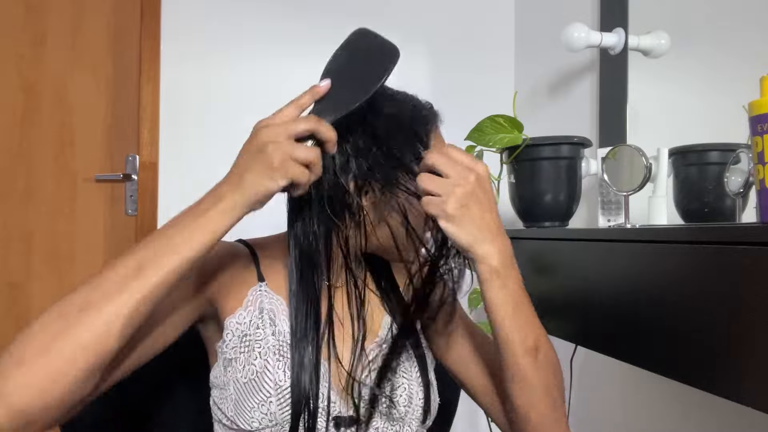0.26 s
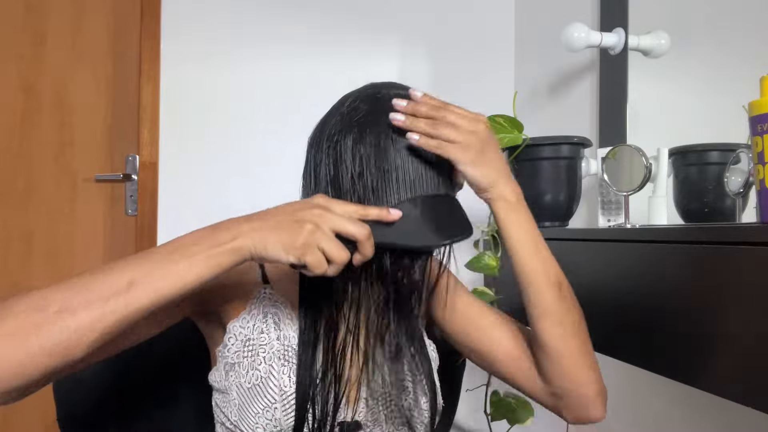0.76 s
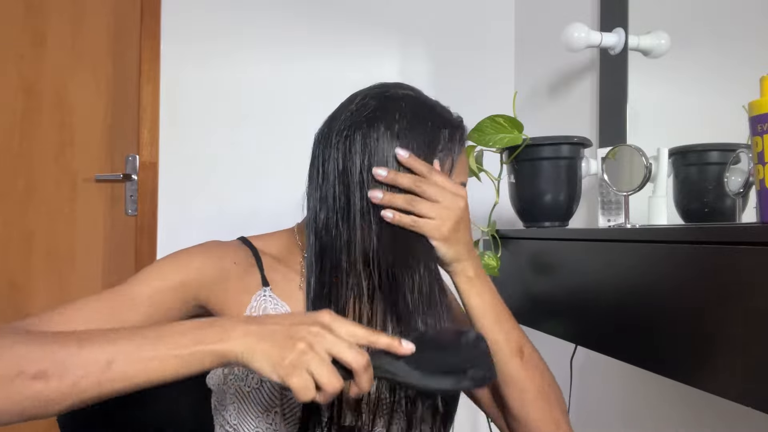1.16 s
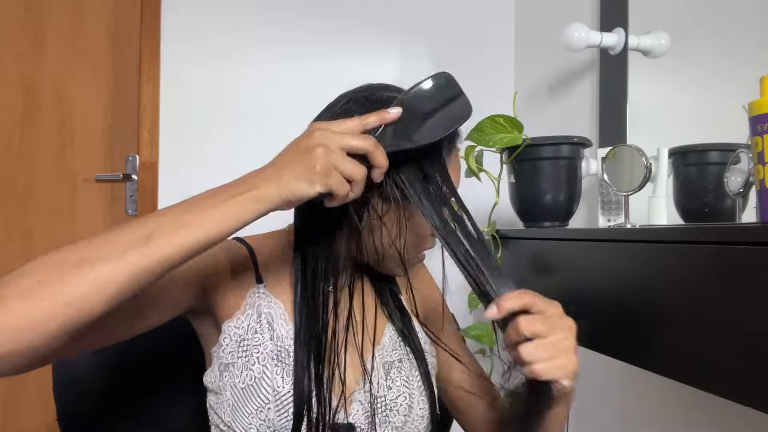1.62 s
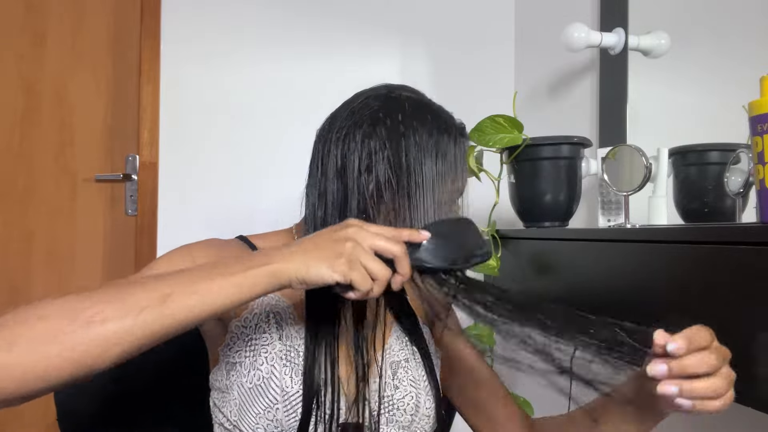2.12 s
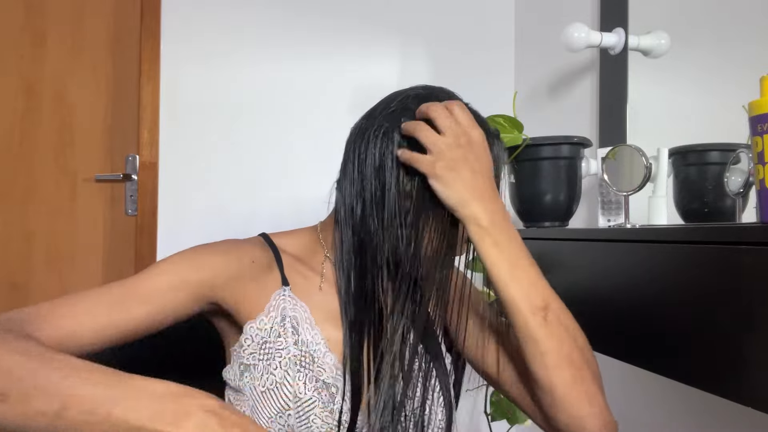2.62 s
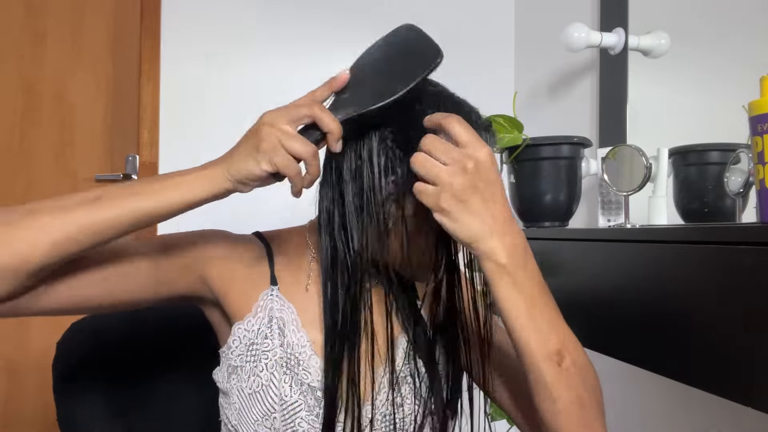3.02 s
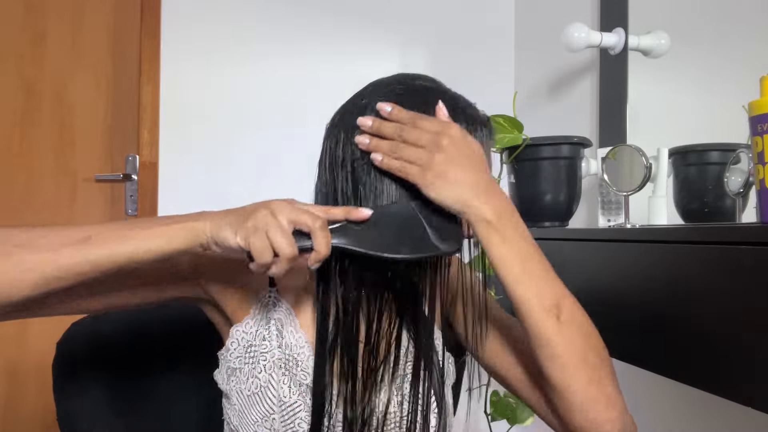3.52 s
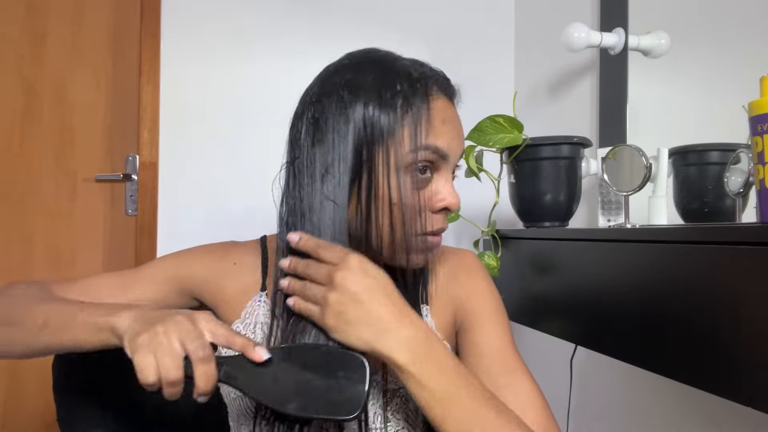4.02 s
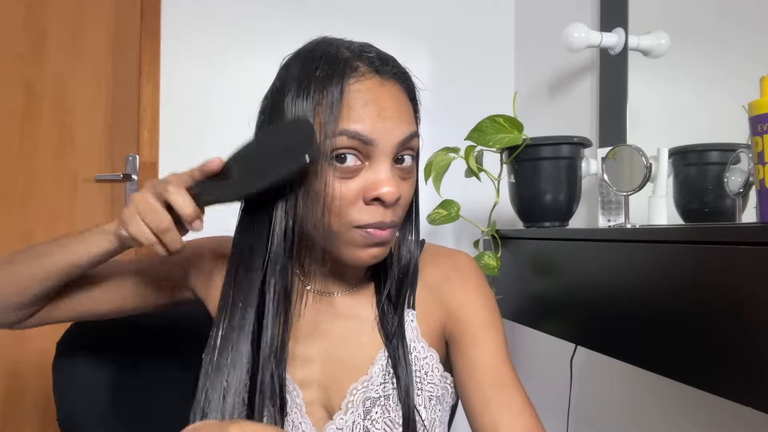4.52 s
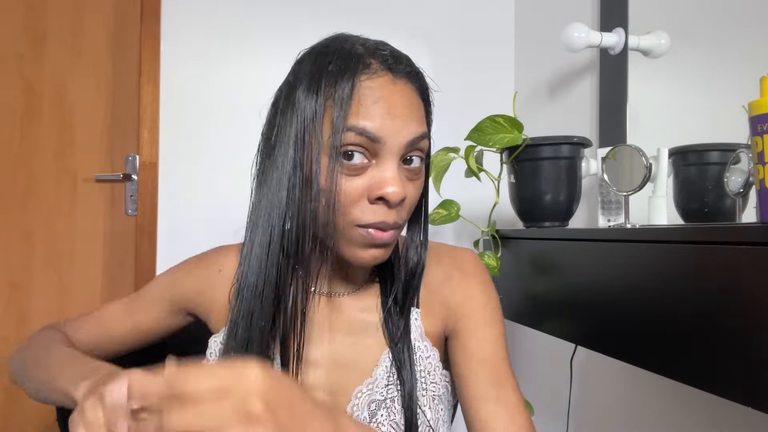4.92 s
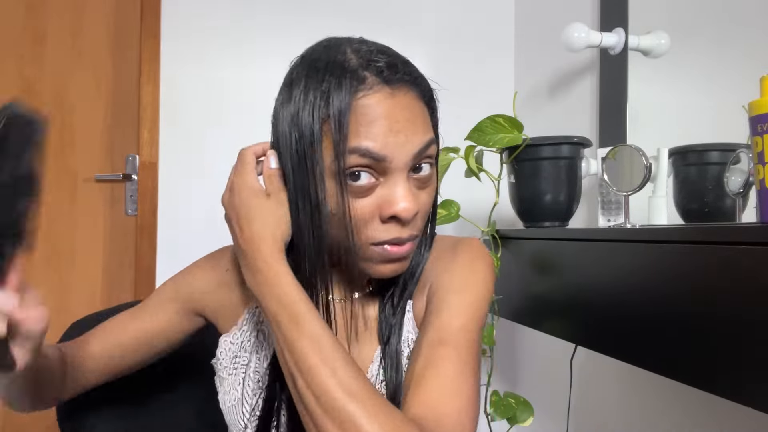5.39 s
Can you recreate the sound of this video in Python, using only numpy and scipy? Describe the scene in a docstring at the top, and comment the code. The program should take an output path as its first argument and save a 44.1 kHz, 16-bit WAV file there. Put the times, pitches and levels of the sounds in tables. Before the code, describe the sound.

A steady low hum, around 60 hertz and gently beating, lies under dull room air and faint microphone hiss. Tiny rubs of fingers and hair open the scene. At 0.5 s a brush presses into wet hair with a grainy, hollow rasp, pin ticks and cushion knocks; a sharp tangle snap near 0.84 s starts a softer hissing pull until about 1.25 s. A quieter stroke runs from 1.7 to 2.3 s, then small snaps at 2.5 s. A scratchy press at 3.2-3.4 s flicks the paddle and slides down until 4 s, with clicks and knocks at 4.2 s. A light press at 4.6 s leads to a thin fading hiss. Around 4.9-5.1 s soft low bumps, a short scrape and a rapid clatter of plucked pins cross clothing, the loudest moment. Afterwards mostly hum remains, with a faint rub at 5.4 s. Close, dry-ish, short small-room reflections.

```python
"""A small room where motors hum and beat: a paddle brush is pulled through long wet hair, close to a phone.
Random slips through resonators make the pins rasp on the scalp; finer noise makes the strands hiss.
Decaying sines ring the paddle and knock the cushion; short noise bursts are tangles snapping.
Near the end the brush bumps and drags over clothing, lower down. The phone listens with two close ports."""
import sys
import numpy as np
from scipy import signal
from scipy.fft import rfft, irfft
from scipy.io import wavfile
from scipy.ndimage import uniform_filter1d

SR = 44100
rng = np.random.default_rng(int(sys.argv[2]) if len(sys.argv) > 2 else 0)


def wav_record(signal):
    """Record a signal, one row per channel, as 16-bit PCM in the file named by sys.argv[1]."""
    frames = np.transpose(np.atleast_2d(signal))
    bounded = np.clip(frames, -1, 1)
    # unit amplitude maps onto the largest positive 16-bit level
    quanta = np.round(bounded * 32767).astype(np.int16)
    wavfile.write(sys.argv[1], SR, quanta)


N = 249312
TIME = np.arange(N) / SR
FREQ = np.maximum(np.arange(N // 2 + 1) * SR / N, 1)
CONTROL_TIME = TIME[::64]  # the hand moves slowly: a coarse clock for its gestures

# paddle modes: multiple of the pitch, mean level/dB, t60/s
PADDLE_MODES = [(0.68, -4, 0.026), (0.95, 0.5, 0.032), (1.147, -3.5, 0.033), (1.35, -7, 0.021),
                (1.7, -27, 0.012), (2.05, -28, 0.014)]
# spectrum of pins rasping: f/Hz, relative level/dB
RASP_SPECTRUM = [(450, -3.5), (760, -3), (900, -10), (1000, 1), (1350, 0.5), (1560, -11.5), (1900, -9),
                 (2400, -12), (3000, -15), (3500, -15), (5000, -20), (9000, -22)]
# spectrum of the cushion's hollow body: f/Hz, relative level/dB
HOLLOW_SPECTRUM = [(100, -47), (210, -4.5), (340, -4), (520, 11), (640, 2), (750, 6.5), (930, -4),
                   (1600, -32.5)]
# the two ports, heard from the head: f/Hz, left minus right level/dB, left leads/rad
HEAD_PORTS = [(58, -4.5, 0.5), (255, -5, 1), (644, -2.5, -1.6), (1230, -4, 0.15), (2140, -1.5, -1.06),
              (3560, -3, -1.33), (4700, -5.5, -2), (7600, -1.5, -1.6), (10500, 0, 0.33), (14500, 0, 3.5)]


def undb(db):
    """Decibels to gain."""
    return np.exp(np.asarray(db) * (np.log(10) / 20))


def unit(x):
    """Scale to rms 1."""
    return x / np.sqrt(np.mean(x ** 2))


def across(points, column=1):
    """Read a table on the log-frequency axis."""
    table = np.array(points)
    return np.interp(np.log(FREQ), np.log(table[:, 0]), table[:, column])


def colour(x, points):
    """Give a sound a spectrum; rms 1."""
    return unit(irfft(rfft(x) * undb(across(points)), N))


def walk(rate):
    """Random levels that glide from one to the next about every 1 / rate s; rms 1."""
    hold = max(int(SR / rate), 1)
    levels = rng.standard_normal(N)[:N // hold + 1]
    return unit(uniform_filter1d(np.repeat(levels, hold), hold)[:N])


def slips(rate, spread_db):
    """Stick-slip clicks of unequal size at random instants, rate per second on average."""
    out = np.zeros(N)
    at = np.flatnonzero(rng.random(N) < rate / SR)
    push, size = rng.standard_normal((2, N), dtype=np.float32)[:, at]
    out[at] = push * undb(spread_db * size)
    return out


def add(out, s, sound):
    """Mix a short sound in at time s."""
    start = int(s * SR)
    out[start:start + len(sound)] += sound[:N - start]


def swell(s, length, rise, fall, fade=0):
    """Gain of one contact: it rises until s, fades for its length, then falls away; slopes in dB per second."""
    age = CONTROL_TIME - s
    rising = rise * np.minimum(age, 0)
    fading = fade * np.clip(age, 0, length)
    falling = fall * np.maximum(age - length, 0)
    return undb(rising - fading - falling)


def strike(events, modes, scatter, crack, push_s, crack_s=0.0025, crack_hz=3200):
    """A yielding contact builds up over push_s and rings the modes, differently each time, with a dull crack."""
    out, t = np.zeros(N), TIME[:SR // 10]
    ratio, db, t60 = np.array(modes).T[:, :, None]
    dull = signal.butter(2, crack_hz, fs=SR, output="sos")
    for s, hz, peak_db, *_ in events:
        detune, size = rng.standard_normal((2, len(modes), 1))
        mode_hz = hz * ratio * (1 + scatter * detune)
        decay = undb(db + 2 * size - 60 * t / t60)
        ring = np.sum(decay * np.sin(2 * np.pi * mode_hz * t), axis=0)
        grit = unit(signal.sosfilt(dull, rng.standard_normal(len(t)))) * np.exp(-t / crack_s)
        build_up = 1 - np.exp(-(t / push_s) ** 2)
        blow = (ring / np.abs(ring).max() + crack * grit) * build_up
        add(out, s, undb(peak_db) * blow / np.abs(blow).max())
    return out


def snaps(events, gain_db, top_hz, fade_s):
    """A wet tangle or a caught pin lets go with a short bright tick of band-limited noise."""
    out, t = np.zeros(N), TIME[:SR // 20]
    for s, *_, db in events:
        burst = rng.standard_normal(len(t)) * np.exp(-t / fade_s)
        add(out, s, undb(db + gain_db) * burst)
    return signal.sosfilt(signal.butter(2, [1900, top_hz], "band", fs=SR, output="sos"), out)


def ports(x, direction):
    """The sound reaches two close ports with unlike strength and timing, set by frequency and direction."""
    lean = undb(across(direction) / 2) * np.exp(.5j * across(direction, column=2))
    return irfft(rfft(x) * np.array([lean, 1 / lean]), N)


def room(x, t60_s, wet_db, low_hz, damp_hz):
    """Close bare walls return a short, duller tail, different on each side."""
    t = TIME[:SR // 2]
    shape = np.exp(-np.log(1000) * t / t60_s) * (t > .003)  # silent until the first return
    tail = rng.standard_normal((2, len(t))) * shape / np.sqrt(np.sum(shape ** 2))
    tail = signal.sosfilt(signal.butter(1, [low_hz, damp_hz], "band", fs=SR, output="sos"), tail)
    return undb(wet_db) * signal.fftconvolve(x[None], tail, axes=1)[:, :N]


def motor_hum(gain_db=2.5, throb_db=2.0, in_step_s=2.505):
    """Motors at slightly different speeds beat together, all in step at one moment; each level wanders."""
    # f/Hz, level/dB before the gain
    hums = [(61.98, -54.4), (58.4, -60), (57.88, -62.8), (123.98, -67)]
    out = 0
    for hz, db in hums:
        level = undb(db + gain_db + throb_db * walk(rate=12.0))
        out = out + level * np.sqrt(2) * np.cos(2 * np.pi * hz * (TIME - in_step_s))
    return out


def room_air(air_db=-59.0, waver_db=0.64):
    """A dull rush of air, wavering slightly: one directional signal, then one for each side."""
    # f/Hz, relative level/dB
    air_spectrum = [(20, -43), (36, -31), (54, 6), (68, 3), (82, 0), (105, -1.5), (155, -13), (225, -6.5),
                    (300, -14.5), (400, -12.5), (630, -20.5), (1000, -31.5), (2000, -40), (4000, -45.5),
                    (15500, -37.5)]
    return [colour(rng.standard_normal(N), air_spectrum) * undb(air_db + waver_db * walk(rate=10.0))
            for _ in range(3)]


def microphone_hiss(level_db=-78):
    """Each microphone adds its own faint, steady noise."""
    # f/Hz, relative level/dB
    mic_spectrum = [(500, 3.5), (3000, 2), (15500, -13.5)]
    steady = np.array([colour(rng.standard_normal(N), mic_spectrum) for _ in range(2)])
    return undb(level_db) * steady


def background(diffuse_db=-4):
    """Hum and air reach the ports; air in the middle range also comes from all sides; the microphones hiss."""
    air, left, right = room_air()
    middle = signal.butter(1, [200, 5000], "band", fs=SR, output="sos")
    diffuse = signal.sosfilt(middle, [left, right])
    return ports(motor_hum() + air + undb(diffuse_db) * diffuse, HEAD_PORTS) + microphone_hiss()


def rustling(slope_db_per_s=136):
    """The arms swing and shift with a low, dull rustle of coloured noise."""
    # arm movements: t/s, length/s, relative level/dB
    moves = [(0.532, 0.25, -57.5), (0.997, 0.18, -62.5), (2.215, 0.039, -62.5), (2.442, 0.064, -60),
             (3.532, 0.43, -63), (4.182, 0.24, -65.5)]
    # f/Hz, relative level/dB
    rustle_spectrum = [(100, -15), (190, 1.5), (300, -2.5), (450, -7), (700, -25.5), (1500, -44.5)]
    effort = sum(undb(db) * swell(s, length, slope_db_per_s, slope_db_per_s) for s, length, db in moves)
    return colour(rng.standard_normal(N), rustle_spectrum) * np.interp(TIME, CONTROL_TIME, effort)


def bumps(gain_db=-4.0, rough=0.52):
    """Soft contacts with the body swell and fade within a few low cycles, roughened by rubbing cloth."""
    # t/s, f/Hz, peak level/dB before the gain, half length to 1/e/s
    thumps = [(4.885, 195, -32.5, 0.021), (4.916, 249, -25.5, 0.0032), (4.937, 246, -31, 0.0094),
              (4.959, 262, -26, 0.005), (4.98, 279.6, -36.5, 0.027), (5.003, 292, -35.5, 0.0061),
              (5.035, 175, -41, 0.041), (5.209, 240, -45.5, .004)]
    thuds = 0
    for s, hz, db, length in thumps:
        age = TIME - s
        thuds = thuds + undb(db) * np.exp(-(age / length) ** 2) * np.cos(2 * np.pi * hz * age)
    return undb(gain_db) * thuds * (1 + rough * walk(rate=200))


def dragging():
    """The pins rake over cloth: a rasp, the hollow cushion and a duller hiss than hair gives."""
    # t/s, length/s (negative: the fall sets in before the rise is over), rasp, hollow body, hiss level/dB
    drag = (5, -0.0134, -51, -45.5, -50.5)
    # hiss of pins on cloth: f/Hz, relative level/dB
    cloth_spectrum = [(1000, -8), (1900, 8), (3300, -1), (4000, -5), (5400, -1), (7500, -7), (10000, -1),
                      (12500, -6), (15500, -2)]
    s, length, rasp_db, hollow_db, hiss_db = drag
    scrape = np.interp(TIME, CONTROL_TIME, swell(s, length, rise=214, fall=296))
    body = np.interp(TIME, CONTROL_TIME, swell(s, length, rise=121, fall=121))
    rasp, hollow, hiss = (colour(slips(rate=2600, spread_db=0.5), points)
                          for points in (RASP_SPECTRUM, HOLLOW_SPECTRUM, cloth_spectrum))
    return (undb(rasp_db) * rasp + undb(hiss_db) * hiss) * scrape + undb(hollow_db) * hollow * body


def plucking():
    """Rows of pins spring off the cloth with a tick and ring the paddle."""
    # t/s, f/Hz, peak level/dB, tick level/dB before its gain
    plucks = [(4.917, 1230, -58, -66), (4.935, 1100, -43, -56), (4.944, 1200, -40.5, -38.5),
              (4.956, 1127, -35, -41), (4.973, 1264, -34, -50), (4.986, 1342, -31.5, -51),
              (4.993, 1154, -28.5, -36), (5.011, 1126, -33.5, -39), (5.018, 1116, -27, -35),
              (5.027, 1140, -31.5, -34), (5.035, 1166, -32.5, -51), (5.047, 1160, -35, -51),
              (5.054, 1147, -32, -38), (5.063, 1110, -38, -35), (5.078, 1260, -43, -40)]
    rings = strike(plucks, PADDLE_MODES, scatter=0.03, crack=0.2, push_s=0.00043)
    return rings + snaps(plucks, gain_db=-9, top_hz=13000, fade_s=.002)


def flicking():
    """Pins flick off the hair and ring the paddle's modes."""
    # t/s, f/Hz, peak level/dB
    flicks = [(0.496, 1170, -46), (0.513, 870, -40), (0.585, 810, -41), (1.161, 1144, -49.5),
              (1.226, 1210, -52), (1.822, 846, -49), (2.929, 1110, -76), (3.167, 1086, -51),
              (3.207, 990, -53), (3.258, 890, -40), (3.297, 1100, -42), (3.322, 835, -42),
              (3.358, 1015, -42.5), (4.1735, 1194, -34.5), (4.184, 1120, -45.5), (4.191, 1130, -39.5),
              (4.2005, 1145, -54), (4.211, 1150, -55), (4.361, 1190, -60), (4.596, 1107, -45.5)]
    return strike(flicks, PADDLE_MODES, scatter=0.04, crack=0.13, push_s=0.00097)


def knocking():
    """The air cushion under the pins knocks, its pitch set by how it is squeezed."""
    # t/s, f/Hz, peak level/dB
    knocks = [(0.587, 684, -41), (0.679, 522, -36), (0.701, 594, -49), (0.712, 490, -46), (0.724, 536, -48),
              (1.929, 493, -52), (3.115, 483, -55.5), (3.359, 551, -40.5), (3.514, 533, -42.5),
              (3.535, 540, -53), (3.553, 547, -51), (4.201, 506, -40.5), (4.213, 528, -42.5),
              (4.252, 579, -46), (4.275, 473, -51), (5.043, 530, -37), (5.073, 503, -38), (5.118, 530, -54)]
    # multiple of the pitch, mean level/dB, t60/s
    cushion_modes = [(.8, -2, 0.023), (0.999, 5, 0.035), (1.27, -7, 0.017)]
    return strike(knocks, cushion_modes, scatter=0.044, crack=0.07, push_s=0.0029)


def catching():
    """A single pin catches in a knot and clicks free, ringing its own short modes."""
    # t/s, f/Hz, peak level/dB
    catches = [(0.496, 2270, -41.5), (0.586, 2300, -41), (1.226, 2240, -51), (1.908, 2500, -48),
               (2.534, 2220, -51), (2.541, 1950, -49), (2.551, 2380, -53), (2.568, 2230, -55),
               (3.359, 2490, -44.5), (3.515, 2400, -55), (4.2, 2170, -49)]
    # multiple of the pitch, mean level/dB, t60/s
    pin_modes = [(.85, -5, 0.0098), (1, 3.5, 0.019), (1.4, -6, 0.011)]
    return strike(catches, pin_modes, scatter=0.045, crack=0.33, push_s=0.00052)


def tangles():
    """Wet strands snap free in short noise bursts."""
    # t/s, level/dB before the gain
    tangle_snaps = [(0.496, -48), (0.584, -42), (0.679, -41), (0.839, -51), (0.844, -35), (1.149, -47),
                    (1.226, -54), (2.528, -42.5), (2.568, -46), (3.36, -51), (4.361, -57), (4.525, -59)]
    return snaps(tangle_snaps, gain_db=-7, top_hz=6750, fade_s=0.0042)


def press_gains():
    """The brush is pressed in at the crown; the cushion meets the hair before the pins bite."""
    # full pressure t/s, held/s, then relative level/dB of rasp, hollow body, hiss, scratch
    presses = [(0.499, 0.13, -51.5, -49.5, -62.5, -56), (1.815, 0.057, -54.5, -53.5, -90, -65),
               (3.27, 0.11, -51, -48.5, -61.5, -54.5), (4.595, 0.024, -53, -53, -59.5, -70)]
    fall, ease = 146, 20.5  # dB per s; the hair yields once the brush moves
    parts = []
    for s, length, rasp_db, hollow_db, hiss_db, scratch_db in presses:
        scrape = swell(s, length, 216, fall, ease)
        body = swell(s, length, 164, fall, ease)
        parts.append([undb(rasp_db) * scrape, undb(hollow_db) * body,
                      undb(hiss_db) * scrape, undb(scratch_db) * scrape])
    return parts


def pull_gains():
    """The brush slides down the lengths; the grip eases off toward the tips."""
    # t/s, length/s, relative level/dB of rasp, hollow body, hiss, scratch, then hiss fade/(dB per s)
    pulls = [(0.833, 0.43, -62, -62, -64, -67.5, 27), (1.723, 0.57, -65.5, -65.5, -71.5, -82, -5.5),
             (3.546, 0.42, -61, -61.5, -64, -67, 21), (4.677, 0.49, -67.5, -84, -62.5, -85, 63)]
    rise, fall, ease = 127, 160, 12  # dB per s
    parts = []
    for s, length, rasp_db, hollow_db, hiss_db, scratch_db, fade in pulls:
        grip = swell(s, length, rise, fall, ease)
        slide = swell(s, length, rise, fall, fade)
        parts.append([undb(rasp_db) * grip, undb(hollow_db) * grip,
                      undb(hiss_db) * slide, undb(scratch_db) * grip])
    return parts


def rub_gains(hollow_db=2, scratch_db=-8.5):
    """Fingers and hair tips rub briefly; hollow body and scratch follow the rasp at fixed offsets."""
    # t/s, length/s, relative level/dB of rasp, hiss
    rubs = [(0.0, 0.0054, -58.5, -64.5), (0.074, 0.098, -75, -76.5), (0.23, 0.14, -99, -79.5),
            (0.404, 0.07, -66.5, -76), (0.652, 0.084, -59.5, -66), (1.275, 0.036, -62, -83),
            (1.726, 0.01, -63, -85), (2.182, 0.071, -69, -79), (2.385, 0.13, -71.5, -77),
            (2.528, 0.029, -61, -71), (2.68, 0.072, -74.5, -77.5), (3.209, 0.028, -52.5, -69),
            (4.055, 0.071, -68, -78), (4.18, 0.02, -54, -68), (4.376, 0.012, -65.5, -95),
            (4.545, 0.02, -80, -76), (4.907, 0.065, -60.5, -87), (5.414, 0.032, -87, -78)]
    parts = []
    for s, length, rasp_db, hiss_db in rubs:
        levels = undb([rasp_db, rasp_db + hollow_db, hiss_db, rasp_db + scratch_db])
        parts.append(np.outer(levels, swell(s, length, rise=605, fall=298)))
    return parts


def contacts():
    """Gains of rasp, hollow body, hiss and scratch through time; presses, pulls and rubs sum in power."""
    parts = press_gains() + pull_gains() + rub_gains()
    gains = np.sqrt(np.sum(np.square(parts), axis=0))
    return [np.interp(TIME, CONTROL_TIME, gain) for gain in gains]


def clumps(gap_s=0.015, uneven=0.53, size_db=2, release_s=0.015, steady=1.5):
    """Wet strands gather before the pins and give way in clumps: sudden surges over a steady drag; rms 1."""
    late, size = rng.standard_normal((2, N // 100))
    at = (np.cumsum(gap_s * np.exp(uneven * late)) * SR).astype(int)
    inside = at < N
    strength = undb(size_db * np.clip(size, -2, 2))
    kicks = np.bincount(at[inside], strength[inside], N)
    surges = signal.lfilter([1], [1, -np.exp(-1 / (release_s * SR))], kicks)
    return unit(steady + surges)


def twangs(rate, spread_db, sharp, wander_db, count=10):
    """Pins of unlike stiffness slip and ring as short resonances (Q = sharp); the busy ones keep changing."""
    out = 0
    for hz in np.geomspace(420, 4200, count):
        b, a = signal.iirpeak(hz, sharp, fs=SR)
        pin = unit(signal.lfilter(b, a, slips(rate, spread_db)))
        out = out + pin * np.sqrt(hz) * undb(wander_db * walk(rate=24))
    return out


def brushing(rasp_db=-3.0, hollow_db=-3, hiss_db=7, flutter_db=0.9, snag_db=1.8):
    """Pins slip in clusters, scratch at their tips and sound the hollow cushion; strands slide with a finer hiss."""
    # strands sliding: f/Hz, relative level/dB
    hiss_spectrum = [(800, -13.5), (2000, -8), (3500, -9.5), (5500, -2.5), (7500, -5.5), (10000, -3.5),
                     (12500, 0), (15500, 3)]
    # pin tips on scalp and strands: f/Hz, relative level/dB
    scratch_spectrum = [(1500, 0), (1850, -1), (2300, 1), (3000, -15), (4200, -20), (6500, -9.5),
                        (10000, -40), (15500, -48)]
    pins, press, slide, tips = contacts()
    catch = clumps()
    rasp = colour(twangs(rate=1400, spread_db=2.5, sharp=2.1, wander_db=4.0) * catch, RASP_SPECTRUM)
    hollow = colour(slips(rate=2000, spread_db=3.0) * catch, HOLLOW_SPECTRUM)
    flutter = undb(flutter_db * walk(rate=41))
    hiss = colour(slips(rate=20000, spread_db=1.5) * flutter, hiss_spectrum)
    snag = undb(snag_db * walk(rate=28))
    scratch = colour(slips(rate=900, spread_db=1.0) * catch * snag, scratch_spectrum)
    body = rasp * pins * undb(rasp_db) + hollow * press * undb(hollow_db)
    return body + scratch * tips + hiss * slide * undb(hiss_db)


def scene():
    """The brush works at the head, then on clothing from another direction; both sound in the room over the hum."""
    # the two ports, heard from the clothing lower down: f/Hz, left minus right level/dB, left leads/rad
    cloth_ports = [(60, 3, 0), (250, -5.5, 0.86), (600, -4, 1.2), (1290, 0, -0.1), (2400, -2.5, 0.55),
                   (3730, -1.5, 1.9), (4730, -7, 4.5), (7300, -2, 4.5), (15200, 2, 9.5)]
    hair = brushing() + rustling()
    taps = knocking() + flicking() + catching() + tangles()
    head_room = room(hair + taps, t60_s=0.23, wet_db=-3, low_hz=203, damp_hz=7000)
    head = undb(-2.0) * hair + taps + head_room
    cloth = dragging() + plucking() + bumps()
    cloth_room = room(cloth, t60_s=0.37, wet_db=-4.0, low_hz=380, damp_hz=4160)
    return ports(head, HEAD_PORTS) + ports(cloth + cloth_room, cloth_ports) + background()


def record(dry):
    """The phone cuts the top steeply above 15750 Hz."""
    return signal.sosfilt(signal.ellip(10, .2, 70, 15750, fs=SR, output="sos"), dry)


dry = scene()
out = record(dry)
wav_record(out)
```